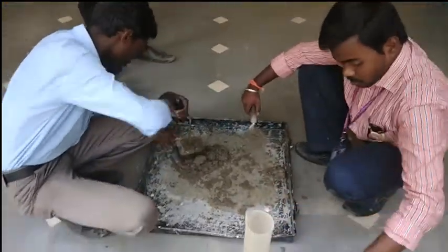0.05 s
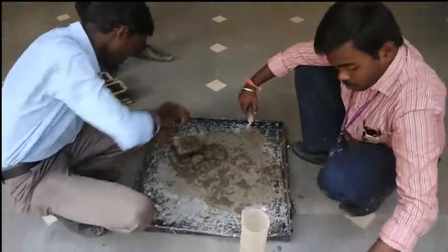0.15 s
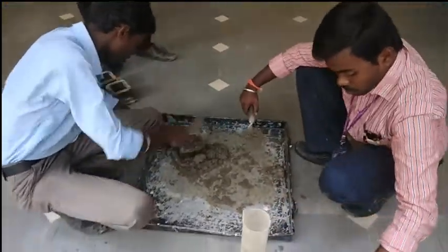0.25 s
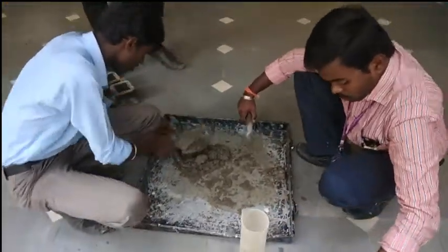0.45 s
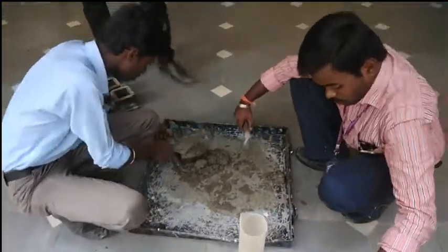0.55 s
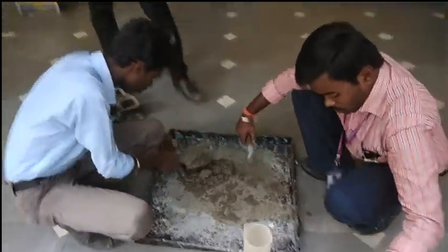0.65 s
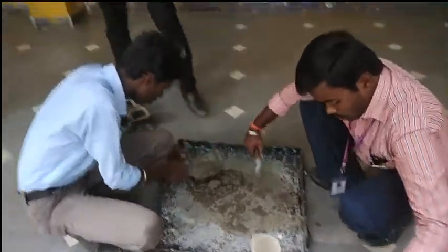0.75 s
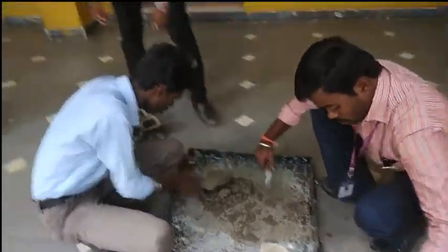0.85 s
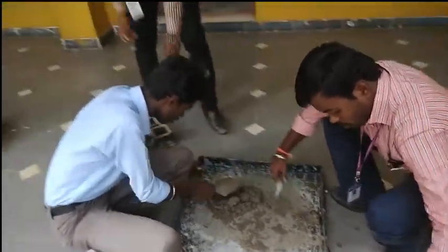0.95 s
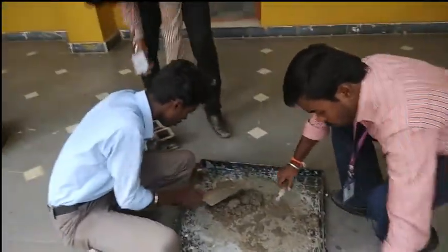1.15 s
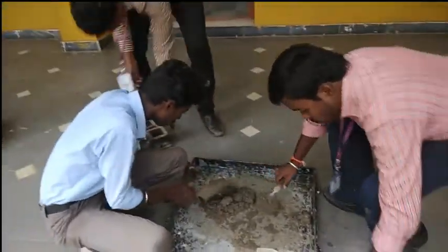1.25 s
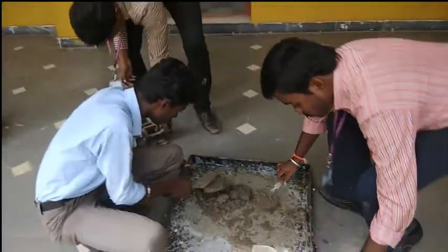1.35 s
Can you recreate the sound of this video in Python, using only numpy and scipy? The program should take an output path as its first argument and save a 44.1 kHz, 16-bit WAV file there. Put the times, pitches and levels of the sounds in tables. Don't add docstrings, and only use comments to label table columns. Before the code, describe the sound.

A small steel trowel lands on a sheet-metal tray at about 0.24 seconds, bouncing with thuds, clanks and bright clinks until 0.33, with a dull floor thump. The hard room rings briefly over faint building murmur. From about 0.7 to 1.2 seconds, blades scrape quietly through wet sandy mortar, hissing and rasping with tiny stone snaps and faint squeals. A last light flick comes near 1.24, then fades.

```python
import sys
import numpy as np
from scipy import signal
from scipy.fft import rfft, irfft, next_fast_len
from scipy.io import wavfile
from scipy.ndimage import uniform_filter1d, map_coordinates

SR = 44100
rng = np.random.default_rng(int(sys.argv[2]) if len(sys.argv) > 2 else 0)


def pcm_store(signal):
    levels = np.round(np.clip(np.atleast_2d(signal), -1, 1) * 32767)
    wavfile.write(sys.argv[1], SR, levels.astype(np.int16).T)


def magnitude_from_level(level_db):
    exponent = np.asarray(level_db, float) / 20
    return 10 ** exponent


N = 61739

# [t/s, thud level/dB, clank
# level/dB, clink level/dB, crack level/dB]
CONTACTS = [(0.2381, -7.5, -6.5, -14.5, -18), (0.2407, -15.5, -11, -22, -33),
            (0.242, -23, -9.5, -29.5, -22), (.254, -16, -16, -41, -42.5), (0.2781, -19.5, -35.5, -7.5, -11),
            (0.2795, -35, -4.5, -3.5, -16), (0.2816, -26, -15, -24, -27), (0.2911, -26.5, -13, -21.5, -30),
            (0.2957, -17, -32, -15.5, -26), (0.2979, -29, -32, -31.5, -22.5),
            (0.2988, -15.5, -20.5, -26, -30.5), (.328, -17, -44.5, -15, -41),
            (0.8404, -78, -58.5, -57, -46), (0.842, -80, -64.5, -58, -33)]
# [f/Hz, level/dB, t60/s]
BODY_THUD = [(294.4, -9, 0.078), (375.7, -3, 0.049), (594, 5, 0.014)]
# [f/Hz, level/dB, t60/s]
HANDLE_CLANK = [(990.5, -7.5, 0.042), (1187, 6, 0.0098), (1300, 4.5, 0.0082), (1440, -25.5, 0.29)]
# [f/Hz, level/dB, t60/s]
BLADE_CLINK = [(2075, 2.5, 0.022), (2179, 0.5, 0.027), (2900, -10.5, 0.0071), (3660, -11, 0.018),
               (4360, -20, 0.0053), (6440, -18.5, 0.027)]
# [f/Hz, level/dB]
CRACK_COLOUR = [(600, -45), (1500, -30), (2600, 2), (5000, 5.5), (7200, -1.5), (10000, -0.5), (14500, -17),
                (15700, -30.5)]
# [f/Hz, phase/rad]
KNOCK_LEAD = [(150, 0.3), (1200, 0.88), (2200, 1.92), (3500, 1.9), (5500, 1.23), (9000, 2), (12000, 1)]
# [t/s, level/dB]
FLOOR_THUMPS = [
    (0.2357, -24.5),
    (0.279, -18.5),
    (0.296, -8),
    (.306, -25),
]
# [f/Hz, level/dB, t60/s]
FLOOR_MODES = [(131, -8, 0.062), (166, 1.5, 0.085), (224, -1, 0.04), (288, -4, 0.074)]
# [t/s, drag level/dB, pressure on tray/dB, flatness of blade/dB]
LIFT = [
    (0, -43.5, -31.5, -20.5),
    (0.029, -51, -33.5, -19.5),
    (.08, -69.5, -26, -12),
    (.14, -70.5, -8.5, -0.5),
    (0.2, -77, 1, 4.5),
]
# [t/s, drag level/dB, pressure on tray/dB, flatness of blade/dB]
DRAG = [(0.643, -62, -19, -4.5), (0.692, -44.5, -19.5, -12.5), (0.746, -46, -8.5, -10),
        (0.753, -34.5, -15.5, -5), (0.789, -43, -10, -5), (0.835, -48.5, -12, -16.5),
        (0.84, -38.5, -2, -10), (0.862, -33.5, -11, -17.5), (0.879, -47.5, -7, -9),
        (0.916, -43.5, -9.5, -8), (0.966, -34, -4, -9), (1.002, -44, -5, -5), (1.02, -47, -10, -13.5),
        (1.035, -42, -7.5, -12.5), (1.0433, -34, -4.5, -10), (1.045, -37.5, -12, -14),
        (1.07, -37, 3.5, -13.5), (1.08, -38, -10.5, -6), (1.122, -32.5, -12, -9.5)]
# [t/s, drag level/dB, pressure on tray/dB, flatness of blade/dB]
FLICK = [
    (1.215, -46.5, -9.5, -3.5),
    (1.237, -37, -18, -22),
    (1.242, -46.5, -18, -8.5),
    (1.29, -51.5, -30, -24),
    (1.33, -73, -42, -40),
    (1.37, -84, -18.5, -16.5),
]
# [f/Hz, width/Hz, level/dB]
EDGE_HISS = [(7800, 3000, -6.5), (8900, 1800, -2.5), (10440, 1400, -5.5), (11870, 590, -2),
             (12370, 550, -3), (15300, 780, -7.5)]
# [f/Hz, width/Hz, level/dB]
FLAT_RASP = [(3190, 180, -4), (3930, 1000, -2), (5140, 780, 0.5), (6240, 930, -4.5)]
# [f/Hz, width/Hz, level/dB]
TRAY_RING = [(780, 87, -12), (1220, 110, -13), (1468, 110, -8.5), (2044, 130, -1.5), (2150, 53, -2.5),
             (2265, 88, -2), (2880, 240, -6.5), (3253, 340, -7.5)]
# [t/s, length/s, f/Hz, width/Hz, level/dB]
CATCHES = [(.2775, 0.0033, 11000, 1500, -25), (.2775, 0.0042, 6500, 1200, -25),
           (.296, .005, 13100, 900, -25.5), (.2955, 0.0027, 14300, 700, -28),
           (.296, 0.0044, 10500, 1500, -26), (.2965, 0.0026, 6100, 700, -27),
           (.750, 0.027, 4190, 905, -43.5), (.751, 0.024, 11700, 696, -42), (0.788, .004, 8200, 2470, -41),
           (0.8393, 0.017, 3150, 1200, -38.5), (0.842, 0.0073, 11900, 900, -30),
           (.8465, .004, 11000, 4000, -33), (0.85, 0.011, 3480, 501, -41),
           (0.857, 0.0073, 11360, 3500, -36), (0.93, 0.012, 5530, 600, -42), (0.943, .004, 12000, 900, -35),
           (0.949, 0.0068, 5300, 800, -44.5), (0.955, .003, 10400, 3000, -42),
           (0.966, .003, 12500, 3500, -33), (0.982, 0.0044, 7500, 4000, -42),
           (1.041, 0.0044, 15300, 900, -27), (1.044, 0.0033, 11840, 2500, -34),
           (1.052, 0.0074, 11800, 700, -33), (1.055, 0.025, 5400, 600, -44),
           (1.066, 0.0038, 11860, 3000, -37), (1.1095, 0.0037, 12500, 3500, -32),
           (1.111, 0.0099, 6240, 1193, -39), (1.118, 0.0086, 7860, 907, -37.5),
           (1.13, .004, 11560, 4000, -36), (1.139, 0.013, 6120, 900, -50),
           (1.158, 0.0031, 10660, 3500, -30), (1.235, .006, 11700, 2520, -44.5)]
# [t/s, length/s, f/Hz, level/dB]
SQUEALS = [(0.199, 0.023, 385, -58), (0.756, 0.063, 385, -63), (0.842, 0.023, 2260, -37.5),
           (0.845, 0.058, 1427, -49.5), (0.933, 0.041, 2265, -44), (1.039, 0.017, 780, -60),
           (1.052, 0.021, 2150, -36.5), (1.054, 0.05, 1300, -49.5), (1.14, 0.12, 1468, -52),
           (1.156, 0.088, 779.7, -61.5), (1.304, 0.098, 1068, -68), (1.39, 0.026, 2150, -65)]
# [f/Hz, t60/s]
ROOM_DECAY = [(80, 0.81), (250, 0.4), (600, 0.39), (1500, 0.55), (2200, 0.57), (4000, 0.51), (10000, 0.53),
              (15000, 0.28)]
# [f/Hz, level/dB]
ROOM_COLOUR = [(60, -4.5), (220, 7), (1000, 4), (2200, 0.5), (3000, 4), (7000, 3), (8700, 3), (15000, 6.5)]
# [f/Hz, likeness/1]
ROOM_ALIKE = [(150, 0.96), (600, 0.75), (1400, 0), (4000, 0)]
# [f/Hz, level per Hz/dB]
AIR_COLOUR = [(60, -35.5), (130, 3.5), (230, -0.5), (600, -11), (1100, -13), (2200, -18), (5000, -23.5),
              (16000, -28.5)]
# [f/Hz, level/dB]
PORTS = [(1000, 0), (1500, -1), (2300, -2.5), (3200, -5.5), (4500, 2), (8000, 4.5), (14000, 3.5)]
# [f/Hz, width/Hz, extra threshold/dB]
WEAK_BANDS = [(3600, 150, 2), (4550, 200, 3), (6350, 200, 4), (7050, 250, 4), (10500, 200, 3),
              (12200, 300, 4), (13500, 300, 3), (14300, 300, 5)]

SCRAPE_WET_DB = -5.5


def unit(x):
    return x / np.sqrt(np.mean(x ** 2) + 1e-20)


def along(points, hz):
    f, v = np.transpose(points)
    return np.interp(np.log(hz + 1), np.log(f + 1), v)


def filtered(x, response):
    m = next_fast_len(x.shape[-1] + 8192)
    spectrum = rfft(x, m) * response(np.fft.rfftfreq(m, 1 / SR))
    return irfft(spectrum, m)[..., :x.shape[-1]]


def resonances(table):
    def response(f):
        total = 0
        for k, (centre, width, db) in enumerate(table):
            damping = 1j * f * width
            total = total + (-1) ** k * magnitude_from_level(db) * damping / (centre * centre - f * f + damping)
        return total
    return response


def wobble(rate):
    knots = rng.standard_normal(int(N * rate / SR) + 4)
    return map_coordinates(knots, [np.arange(N) * rate / SR])


def pair(a, b, alike):
    def balance(hz):
        turn = np.arccos(np.clip(along(alike, hz), -1, 1)) / 2
        return np.array([np.cos(turn), np.sin(turn)])
    mid, side = filtered(np.array([a, b]), balance)
    return np.array([mid + side, mid - side])


def struck(db, modes, t):
    total = 0
    for hz, level, t60 in modes:
        decay = magnitude_from_level(db + level + rng.normal(0, 1) - 60 * t / t60)
        total = total + decay * np.sin(2 * np.pi * hz * rng.normal(1, 0.0018) * t)
    return total * (1 - np.exp(-t / 0.00025)) / -2


def crack(db, t):
    noise = filtered(rng.standard_normal(len(t)), lambda hz: magnitude_from_level(along(CRACK_COLOUR, hz)))
    return unit(noise) * magnitude_from_level(db - 60 * t / 0.0094)


def knocks():
    flat_until_s, flat_top_hz = 0.27, 9000
    knock_wet_db, thump_wet_db = -2.5, -3
    out, t = np.zeros((2, N)), np.arange(SR // 5) / SR
    sounds = []
    for s, thud_db, clank_db, clink_db, crack_db in CONTACTS:
        sound = struck(thud_db, BODY_THUD, t) + struck(clank_db, HANDLE_CLANK, t)
        sound = sound + struck(clink_db, BLADE_CLINK, t) + crack(crack_db, t)
        sounds.append((s, sound, knock_wet_db))
    for s, db in FLOOR_THUMPS:
        sounds.append((s, struck(db, FLOOR_MODES, t), thump_wet_db))

    def lead(hz):
        return np.exp(1j * along(KNOCK_LEAD, hz) / 2 * np.array([[1], [-1]]))

    def dull_wet(hz):
        return 1 / (1 + 1j * hz / flat_top_hz) / (1 + (hz / flat_top_hz / 1.1) ** 12)

    for s, sound, wet_db in sounds:
        start, hit = round(s * SR), np.zeros(N)
        hit[start:start + len(t)] = sound[:N - start]
        wet = room(hit) * magnitude_from_level(wet_db)
        if s < flat_until_s:
            wet = filtered(wet, dull_wet)
            hit = filtered(hit, lambda hz: 1 / (1 + (hz / flat_top_hz / 1.5) ** 30))
        out = out + filtered(np.array([hit, hit]), lead) + wet
    return out


def grit():
    grains_per_s, spread_db, patchy_db = 8300, -1, 2.5
    hits = rng.random(N) < grains_per_s / SR
    sizes = magnitude_from_level(spread_db * np.minimum(rng.exponential(1, N), 3))
    z = signal.stft(hits * rng.standard_normal(N) * sizes, nperseg=512)[2]
    patches = uniform_filter1d(rng.standard_normal(z.shape), 5, 0)
    patches = uniform_filter1d(patches, 8, 1)
    return signal.istft(z * magnitude_from_level(patchy_db * unit(patches)), nperseg=512)[1][:N]


def grit_driven(db, body, low_hz, alike):
    x = np.array([grit(), grit()])

    def shape(hz):
        return resonances(body)(hz) / (1 + (low_hz / (hz + 1)) ** 6)
    left, right = filtered(x * magnitude_from_level(db), shape) / np.std(filtered(x, shape))
    return pair(left, right, [(1000, alike)])


def scrape():
    s, *controls = np.transpose([*LIFT, *DRAG, *FLICK])
    drag_db, press_db, flat_db = [np.interp(np.arange(N) / SR, s, c) for c in controls]
    slump_db = -73.5 + 0.24 * (uniform_filter1d(drag_db, 4000) + 46) + 3 * wobble(31)
    drag_db = drag_db + wobble(120) + 0.22 * wobble(35)
    rasp_db = drag_db + flat_db + 0.68 * wobble(50)
    ring_db = drag_db + press_db + 0.57 * wobble(60)
    hiss = grit_driven(drag_db, EDGE_HISS, 6500, alike=0.2)
    rasp = grit_driven(rasp_db, FLAT_RASP, 2400, alike=0.24)
    ring = grit_driven(ring_db, TRAY_RING, 1150, alike=0.8)
    slump = grit_driven(slump_db, [(289, 140, 0)], 120, alike=0.38)
    close = hiss + rasp + ring + slump
    return close + magnitude_from_level(SCRAPE_WET_DB) * room(close.mean(0))


def catches():
    out = np.zeros((2, N))
    for s, length, hz, width_hz, db in CATCHES:
        start, u = round(s * SR), np.arange(2048) / SR / length
        body = resonances([(hz, width_hz, 0)])
        noise = filtered(rng.standard_normal((2, len(u))), lambda f: body(f) ** 2)
        burst = np.sin(np.pi * np.clip(u, 0, 1) ** 0.5) ** 2
        out[:, start:start + len(u)] += magnitude_from_level(db) * unit(noise) * burst
    out = pair(*out, [(1000, 0.25)])
    return out + magnitude_from_level(-6.5) * room(out.mean(0))


def squeals():
    width_hz = 45
    t, out = np.arange(N) / SR, np.zeros(N)
    for s, length, hz, db in SQUEALS:
        swell = np.abs(np.sin(np.pi * np.clip((t - s) / length, 0, 1) ** 0.4) ** 1.5)
        phase = 2 * np.pi * np.cumsum(hz + width_hz * hz / 2000 * wobble(150)) / SR
        out = out + magnitude_from_level(db + 5.5 * wobble(200)) * swell * np.sin(phase)
    return out + magnitude_from_level(SCRAPE_WET_DB) * room(out)


def room(x):
    hz, t, z = signal.stft(rng.standard_normal((2, SR)), SR, nperseg=256)
    tail_db = along(ROOM_COLOUR, hz)[:, None] - 60 * t / along(ROOM_DECAY, hz)[:, None]
    a, b = signal.istft(z * magnitude_from_level(tail_db), SR, nperseg=256)[1]
    tail = pair(a, b, ROOM_ALIKE)
    delayed = np.pad(x, (180, 0))[None]
    return signal.fftconvolve(delayed, tail / np.linalg.norm(tail[0]), axes=1)[:, :N]


def air():
    a, b = filtered(rng.standard_normal((2, N)), lambda hz: magnitude_from_level(along(AIR_COLOUR, hz)))
    return magnitude_from_level(-67.5 + 1.5 * wobble(6)) * unit(pair(a, b, ROOM_ALIKE))


def scene():
    return knocks() + scrape() + catches() + squeals() + air()


def gate(x):
    mask_db, hush_db, never_over_db = -6, -98, -71
    reach_bands, from_hz = 5, 2750
    hz, t, z = signal.stft(x, SR, nperseg=2048)
    bands = z[:, :1024].reshape(2, 64, 16, -1)
    power = np.mean(np.abs(bands) ** 2, axis=(0, 2))
    power = uniform_filter1d(power, size=2, axis=1)
    whim = magnitude_from_level(4 * unit(uniform_filter1d(rng.standard_normal(power.shape), size=4, axis=1)))
    band_hz = hz[8:1024:16, None]
    weak_db = sum(db * np.exp(-((band_hz - c) / w) ** 2) for c, w, db in WEAK_BANDS)
    neighbours = uniform_filter1d(power, size=reach_bands, axis=0)
    mask = np.maximum(magnitude_from_level(2 * (mask_db + weak_db)) * neighbours, magnitude_from_level(2 * hush_db))
    mask = np.minimum(mask, magnitude_from_level(2 * never_over_db))
    keep = np.repeat(power * whim > mask, 16, axis=0) | (hz[:1024, None] < from_hz)
    return signal.istft(z * np.pad(keep, ((0, 1), (0, 0))), SR, nperseg=2048)[1][:, :N]


def band_limit(x):
    return signal.sosfilt(signal.butter(12, 16380, fs=SR, output="sos"), x)


def record(dry):
    low_cut_hz, top_hz, ceiling = 147, 15900, 1

    def ports(hz):
        band = (1j * hz / (1j * hz + low_cut_hz)) ** 2 / (1 + (hz / top_hz) ** 60)
        return band * magnitude_from_level(along(PORTS, hz) / 2 * np.array([[1], [-1]]))
    x = filtered(dry, ports)
    x = x / (1 + np.abs(x / ceiling) ** 4) ** 0.25
    x = filtered(x, lambda hz: hz < 16300)
    mix = gate(x)
    return band_limit(mix)


dry = scene()
out = record(dry)
pcm_store(out)
```